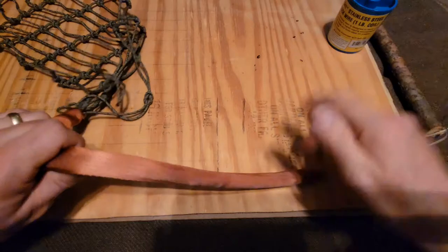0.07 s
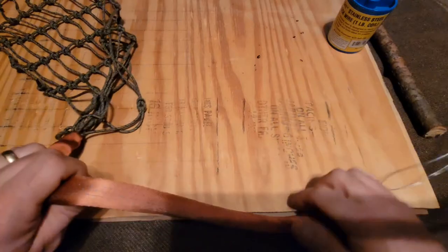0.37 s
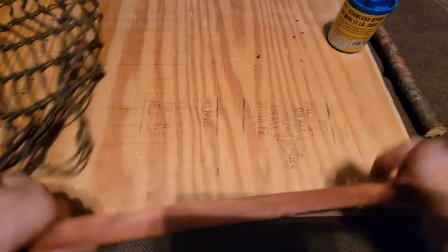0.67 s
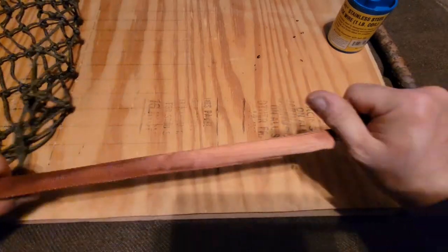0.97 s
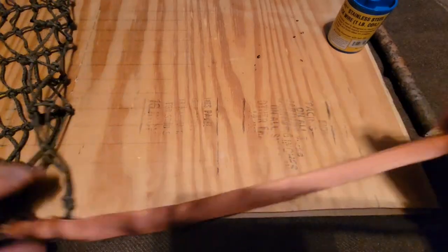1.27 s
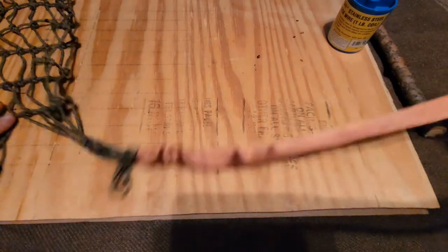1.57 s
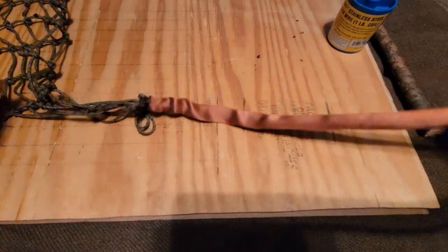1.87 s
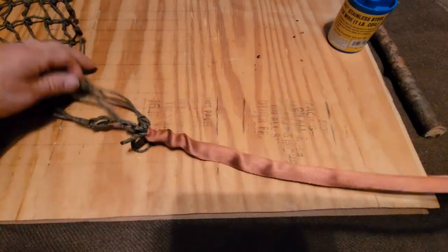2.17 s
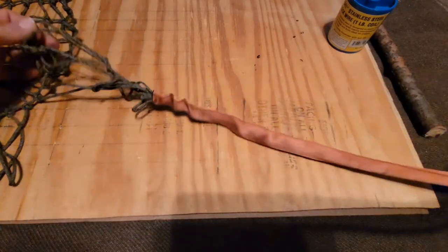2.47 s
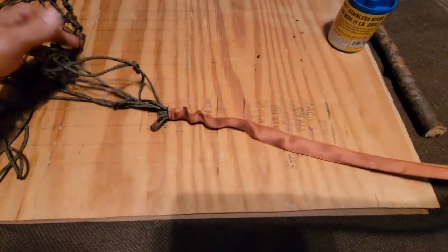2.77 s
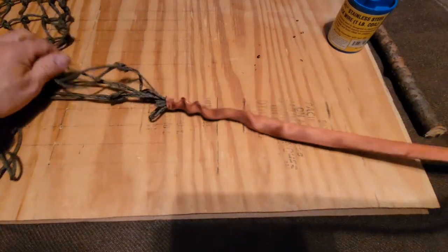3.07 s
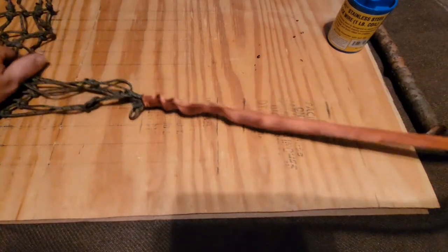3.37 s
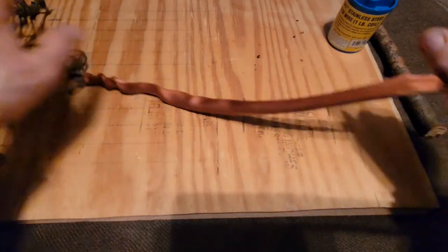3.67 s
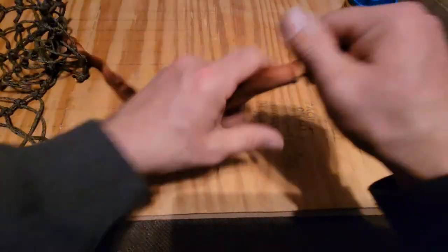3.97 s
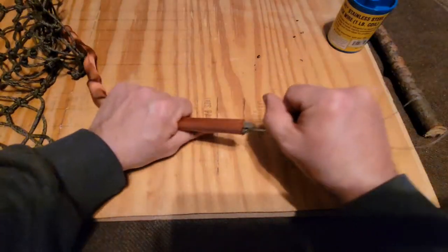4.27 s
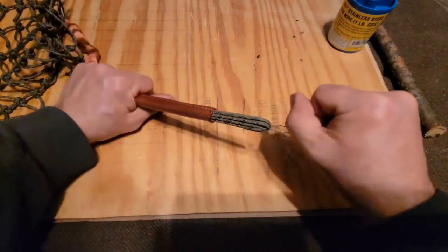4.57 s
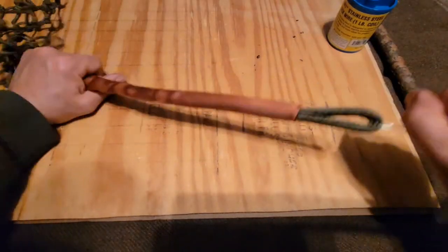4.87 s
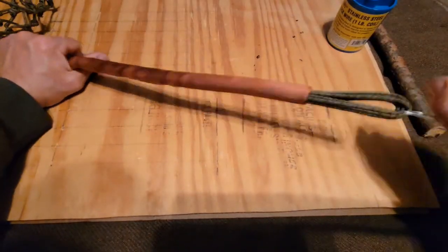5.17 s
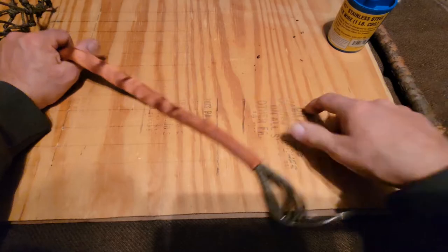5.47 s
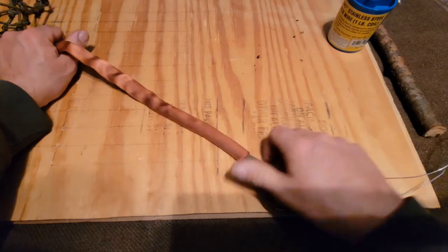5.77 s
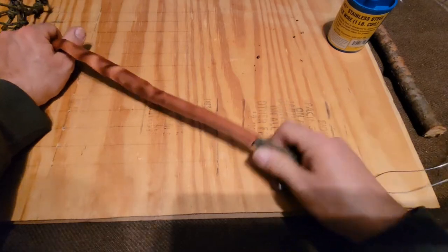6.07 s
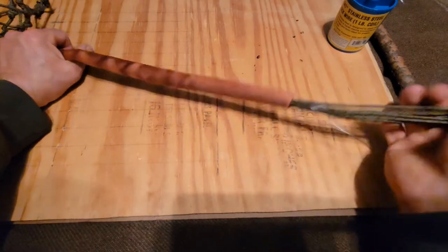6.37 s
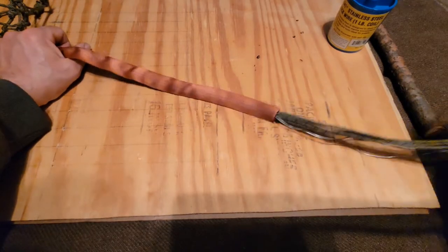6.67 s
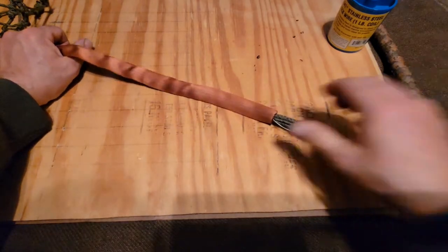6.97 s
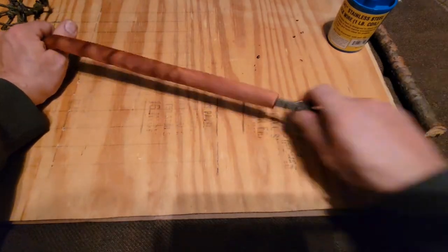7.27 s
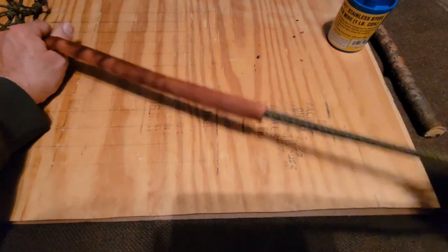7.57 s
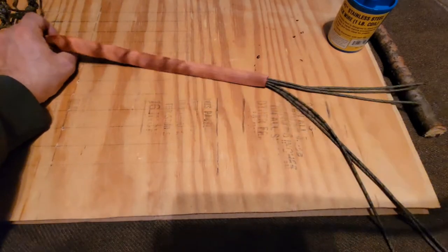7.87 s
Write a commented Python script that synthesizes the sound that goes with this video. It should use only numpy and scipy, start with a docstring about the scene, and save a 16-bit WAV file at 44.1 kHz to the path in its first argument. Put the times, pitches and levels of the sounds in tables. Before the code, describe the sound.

Close up in a small room, nylon webbing is bunched and slid along cord by hand, making dry, irregular rustles and swishes. Knotted netting drags across a plywood board, mixed with small clicks of wire and cord and soft hand bumps. After a quieter spell the strokes come thicker and a little louder, followed by a distinct knock on the wood, one more sliding pull and a final tap.

```python
"""Cord net through a nylon sleeve

Hands pull a cord net through a sleeve of nylon webbing on a plywood board, in a small room.
Stick-slip friction makes the weave hiss, sing and zip, and knots drag over the wood.
A thin pulling wire and the cord tick as they catch and snap free; bumps from hands and
bundled cord excite the damped modes of the board."""
import sys
import numpy as np
from scipy import signal
from scipy.fft import rfft, irfft, next_fast_len
from scipy.io import wavfile

SR = 44100
rng = np.random.default_rng(int(sys.argv[2]) if len(sys.argv) > 2 else 0)


def store_wav(level_fs):
    """Save 16-bit WAV to argv[1]."""
    pcm = np.round(np.clip(np.atleast_2d(level_fs), -1, 1) * 32767)
    wavfile.write(sys.argv[1], SR, pcm.T.astype(np.int16))


N = 352888

# spectrum of still air and microphone hiss: (frequency [Hz], relative density [dB])
AIR_SPECTRUM = [(20, -57.5), (70, 16), (250, 9), (500, 2), (1000, 5), (2000, -8.5), (4200, -5),
                (6000, -27.5), (16000, -27)]
# reverberation of the room: (frequency [Hz], T60 [s])
ROOM_DECAY = [(80, 0.53), (300, 0.27), (1000, 0.22), (4000, 0.19), (9000, 0.058), (16000, 0.17)]
# likeness of the diffuse sound at left and right: (frequency [Hz], correlation [-1 to 1])
COHERENCE = [(100, 0.85), (280, 0.87), (500, 0.016), (1100, -0.52), (2200, -0.27), (5000, -0.21),
             (16000, 0.15)]
# mismatch of the microphones: (frequency [Hz], left minus right [dB])
MIC_MISMATCH = [(300, 0.5), (1000, 0.5), (2000, -0.5), (4000, -2), (8000, 6), (12000, 2.5)]

# modes of the board and of the wire: (frequency [Hz], relative level [dB], T60 [s])
BOARD_MODES = [(78, -21.5, 0.13), (100, -9, 0.018), (154, -8.5, 0.017), (207, -14.5, 0.2), (298, 8.5, 0.02),
               (428, -10, 0.04), (550, -8.5, 0.029), (826, -1.5, 0.033), (988, 0, 0.037),
               (1216, 3.5, 0.019), (1660, -12, .03), (2350, -27, .02)]
WIRE_MODES = [(3800, 0, 0.16), (3980, 34, 0.21), (4900, -5.5, 0.16), (8100, -20, 0.11), (12400, -33, 0.12),
              (14000, -10, .1), (13500, 5, .07)]
# blows on the board: (time [s], relative peak level [dB], contact time [ms])
BLOWS = [(0.072, -43, 2.7), (0.536, -36.5, 5.3), (.55, -33, 3.5), (0.646, -22.5, 3.7), (1.75, -33, 6.1),
         (1.77, -39, 4.7), (2.285, -45, 0.54), (2.406, -40, 0.82), (2.635, -40, 0.32), (2.933, -29.5, 0.39),
         (2.942, -34, 4.2), (3.213, -41.5, 11), (3.56, -54, 1.2), (4.068, -26.5, 0.86), (4.776, -39.5, 13),
         (4.931, -34.5, 8.4), (5.075, -30.5, 5.6), (5.378, -42, 7.6), (5.565, -31, 0.59), (5.581, -34, 6.5),
         (5.614, -34.5, 8.5), (5.817, -30, 2.4), (5.831, -32.5, 0.97), (5.95, -30.5, 2.8), (6.086, -38, 10),
         (7.075, -44, 1.5), (7.124, -42, 1), (7.188, -43.5, 3.7), (7.3002, -15, 1.5), (7.31, -11.5, 1.54),
         (7.326, -29, 8), (7.355, -31, 0.69), (7.398, -44, 9.1), (7.989, -20, 0.55)]
# snaps of wire and cord: (time [s], relative level [dB], brightness index, left minus right [dB])
SNAPS = [(0.0458, -33, -22, 1.5), (0.0544, -30, -22, 3.5), (0.0731, -28, -12.5, 2.5),
         (0.1008, -34, -18, -1.0), (0.167, -38, -16, -4), (0.188, -36, -21, 8), (0.361, -33.5, -20, 0.5),
         (0.3894, -38.5, -24, -3.5), (0.4137, -34, -16, -1), (0.4736, -33, -19, 1.5),
         (0.4815, -34.5, -20, 1), (0.5386, -32, -26, 0), (0.5497, -32, -7, 3), (0.6481, -34, -10.5, 2.5),
         (1.298, -39.5, -22, 0.5), (1.737, -40, -40, 1), (1.7501, -30, -50, 3), (2.0877, -55, -17, 8),
         (2.259, -54, -8, 7), (2.282, -45, -46, 9.5), (2.544, -52, -13, -2), (2.6358, -44.5, -44, -0.5),
         (2.875, -47.5, -15, 13), (2.9316, -27, -35.5, 1.5), (3.5595, -39, -40, 4), (4.07, -30.5, -42, 0.0),
         (4.23, -42.5, -16.5, 3), (4.3216, -34, -14.5, 0.5), (4.975, -53, -36, 0), (5.0494, -31, -19, 3.5),
         (5.1074, -35, -19, 1.5), (5.1817, -33.5, -19, -0.5), (5.3505, -38, -20, 1.5),
         (5.46, -36.5, -20, 0), (5.6574, -36.5, -18, 2), (5.689, -17, -14.5, 2), (5.6972, -28, -11, -1.5),
         (5.8142, -33, -28, 2.5), (5.8519, -31, -15, -0.5), (5.9427, -31.5, -32, 1.5), (5.977, -36, -11, 2),
         (6.124, -42, -30, -0.5), (6.2405, -47.5, -21, 2.5), (6.325, -45, -17, 1), (6.495, -39, -1, -2),
         (6.711, -37.5, -16, -3.5), (6.7345, -32, -13, 1.5), (6.787, -30, -12, 0), (6.887, -30.5, -17, 1),
         (6.908, -29, -12.5, 1.5), (6.9204, -32, -30, -8), (7.08, -49, -23, 2.5), (7.2991, -35.5, -28, 5.5),
         (7.3557, -42, -24, 4.5), (7.8181, -28, 21, 0), (7.988, -25.5, -22.5, 0.5)]
# spectra of snapping wire, slapping cord, rubbed wood and rubbed nylon:
# (frequency [Hz], relative density [dB])
WIRE_SPECTRUM = [(100, 5), (500, -12.5), (1200, 4), (2000, 4.5), (2900, 7.5), (3900, 9.5), (5200, 2.5),
                 (7000, 1.5), (9800, -6), (12000, -1.5), (14000, -3), (16000, -13.5)]
SLAP_SPECTRUM = [(100, -22.5), (400, 10.5), (1100, 3.5), (1700, -1), (2700, 5), (4200, -15.5),
                 (6000, -18.5), (16000, -65)]
WOOD_SPECTRUM = [(25, -65), (70, -10.5), (130, -8), (240, 1.5), (340, -0.5), (480, -4), (620, -9),
                 (800, -3), (1080, -6), (1400, -15.5), (2400, -15.5), (4200, -26), (6000, -29),
                 (16000, -59)]
NYLON_SPECTRUM = [(100, -0.5), (600, -25.5), (850, -6), (1180, 3), (1600, 0.5), (2100, 1.5), (3200, 3),
                  (4200, 4), (5500, -4.5), (7500, -4.5), (10000, -7.5), (13000, -5), (14500, -6),
                  (16000, -12)]
# band in which the weave sings: (frequency [multiple of the centre], relative density [dB])
WEAVE_BAND = [(.02, -18), (.68, -28), (.86, -3.5), (1, 4), (1.11, -7.5), (1.25, -28), (3.6, -38)]

# where the rubbing is; each layer scales this bias: (time [s], leftward bias [dB])
RUB_POSITION = [(0, 2), (.65, 1.5), (.85, 2.5), (3.5, 3.5), (4.4, 3), (4.8, 4), (5.2, -2.5), (6.3, 1),
                (6.45, 3.5), (6.65, 0), (7.3, -4), (7.6, 4), (8, 2.5)]
# regular stick-slip on weave or wood:
# (start [s], length [s], first frequency [Hz], last frequency [Hz], level [dB], pitch jitter [fraction])
SLIP_GLIDES = [(3.82, .11, 12950, 12700, -73, .005), (3.92, .26, 9800, 7300, -75, .006),
               (4.04, .12, 11700, 10450, -77, .006), (4.04, .05, 1043, 1240, -54, .15),
               (5.736, 0.046, 175, 139, -41, .02), (6.427, .1, 1000, 1800, -54, 0.2),
               (6.659, 0.21, 290.6, 263, -56, 0.316), (7.387, .095, 4450, 5750, -74, .014),
               (7.9, 0.08, 12100, 11250, -68, .005)]
# steady pulls of cord or wire through the sleeve, at relative levels:
# (start [s], length [s], hiss [dB], singing [dB], band centre [Hz])
LONG_PULLS = [(0.222, 0.39, -63, -57.5, 1620), (0.979, 0.63, -66.5, -63, 4500),
              (3.727, 0.42, -61.5, -62.5, 4380), (5.719, 0.32, -69, -58.5, 4350),
              (7.462, .46, -61, -70, 3950)]
# rustle of the held net, at relative levels: (time [s], nylon [dB], wood [dB])
NET_RUSTLE = [(0, -54, -54.5), (.3, -88.5, -60), (.68, -60.5, -76), (.8, -66.5, -64.5),
              (1.55, -67.5, -57.5), (2.1, -79, -84), (2.7, -64, -69.5), (3.1, -70.5, -70),
              (3.3, -63, -56.5), (3.95, -75, -60.5), (4.45, -69, -68.5), (5.3, -62, -59.5),
              (5.53, -70, -73), (5.9, -60.5, -56.5), (6.27, -67, -68.5), (6.85, -60, -74),
              (7.22, -73.5, -71), (7.9, -65, -61)]
# hand strokes, at relative levels; a tighter grip adds to the nylon's rasp below RASP_HZ:
# (start [s], rise time [s], length [s], hiss [dB], drag on wood [dB], grip [dB])
HAND_STROKES = [(0.0, .02, 0.077, -69.5, -51, -8), (0.347, 0.0085, 0.23, -67, -55, 7.5),
                (0.63, .012, 0.047, -56, -47, 4.5), (0.847, 0.083, 0.18, -53, -45.5, -1),
                (1.71, .04, 0.23, -52.5, -50, -11), (2.211, .05, 0.1, -72, -62.5, -13),
                (2.383, .03, 0.13, -74, -62.5, -0.5), (2.561, .05, 0.092, -98.5, -57.5, 8.5),
                (2.706, 0.033, 0.029, -55, -52.5, -2), (2.787, .015, 0.013, -58.5, -67, -5),
                (2.859, 0.052, 0.14, -55, -54, -3), (3.154, .06, 0.073, -54.5, -56.5, 2),
                (3.311, .1, 0.13, -49.5, -44.5, -8), (3.515, .12, 0.36, -57.5, -57, 1),
                (4.03, 0.011, 0.045, -80.5, -40, 25.5), (4.15, .06, 0.065, -54.5, -63, -8),
                (4.272, 0.01, 0.033, -64, -53, -7), (4.304, 0.0074, 0.012, -61, -50, -1),
                (4.535, .075, 0.086, -52, -54, -2), (4.73, 0.057, .06, -51.5, -55, -2.5),
                (4.862, 0.046, 0.12, -49, -54, 0.5), (5.042, 0.011, 0.071, -46.5, -49, 0.5),
                (5.137, 0.056, .125, -50.5, -53.5, -9), (5.346, .008, 0.12, -60.5, -59.5, 0.5),
                (5.557, .012, 0.094, -59, -52.5, 0.5), (5.637, .08, 0.1, -44.5, -44.5, -1.5),
                (5.747, .04, 0.09, -51.5, -52, -0.5), (5.89, .04, 0.15, -67.5, -62.5, 13),
                (6.367, .09, 0.17, -53, -76, -3.5), (6.534, .05, 0.11, -61, -56.5, 4.5),
                (6.662, .07, 0.13, -54.5, -59, 3), (6.863, .03, 0.11, -58, -52.5, -4),
                (7.29, 0.011, 0.066, -60.5, -45.5, 6), (7.363, 0.015, 0.042, -64.5, -67, 8),
                (7.785, .09, 0.12, -53.5, -60.5, -15), (7.978, .012, 0.025, -56, -38.5, 19.5)]

RASP_HZ, RESTING_GRIP_DB = 4000, -2
PULL_RISE_S, STOP_TIME_CONSTANT_S = 0.039, 0.021
LEAD_MS_PER_DB = 0.38


def amp(db):
    """Amplitude ratio of a level in decibels."""
    return 10 ** (np.asarray(db) / 20)


def unit(x):
    """Normalisation to rms 1."""
    return x / np.sqrt(np.mean(x ** 2) + 1e-20)


def at_frequency(points, hz):
    """Interpolation on a log-frequency axis."""
    f, value = np.transpose(points)
    return np.interp(np.log(hz + 1), np.log(f), value)


def curve(rows):
    """Linear interpolation of a time curve at every sample."""
    return np.interp(np.arange(N) / SR, *np.transpose(rows))


def add(mix, start_s, sound):
    """Superposition: a sound joins the mix at its start time."""
    part = mix[..., max(round(start_s * SR), 0):][..., :sound.shape[-1]]
    part += sound[..., :part.shape[-1]]


def colour(x, spectrum, tilt_db=0, size=2048):
    """Minimum-phase filtering to a spectrum; the tilt is a treble shelf."""
    hz = abs(np.fft.fftfreq(size, 1 / SR))
    shelf_db = tilt_db * hz ** 2 / (hz ** 2 + 7000 ** 2)
    log_gain = np.log(amp(at_frequency(spectrum, hz) + shelf_db))
    taps = np.fft.ifft(np.exp(np.conj(signal.hilbert(log_gain)))).real
    return signal.oaconvolve(x, taps)[:len(x)]


def wander(rate_hz, size=N):
    """Smooth random fluctuation: low-passed noise of rms 1."""
    span = next_fast_len(size)
    hz = np.fft.rfftfreq(span, 1 / SR)
    spectrum = rfft(rng.standard_normal(span)) / (1 + (hz / rate_hz) ** 4)
    return unit(irfft(spectrum, span)[:size])


def micro_slips(per_s, spread_db):
    """Shot noise: tiny slips at random times, a few much larger than the rest."""
    size = amp(spread_db * np.minimum(rng.exponential(1, N), 4))
    return unit(size * rng.choice([-1, 1], N) * (rng.random(N) < per_s / SR))


def placed(x, pan_db):
    """Level and time differences: the nearer microphone hears a sound louder and earlier."""
    lead = pan_db * LEAD_MS_PER_DB * SR / 1000
    channels = []
    for side in (1, -1):
        index = np.rint(np.arange(len(x)) + side * lead / 2).astype(int)
        channels.append(amp(side * pan_db / 2) * x[np.clip(index, 0, len(x) - 1)])
    return np.array(channels)


def diffuse_pair(spectra, hz):
    """Partial coherence: two independent spectra become alike in the bass, partly opposed in the middle."""
    same = np.clip(at_frequency(COHERENCE, hz), -1, 1)
    return np.array([spectra[0], same * spectra[0] + np.sqrt(1 - same ** 2) * spectra[1]])


def still_air():
    """Stationary noise: the air of the room and microphone hiss."""
    span = next_fast_len(N)
    hz = np.fft.rfftfreq(span, 1 / SR)
    noise = diffuse_pair(rfft(rng.standard_normal((2, span))), hz)
    air = irfft(noise * amp(at_frequency(AIR_SPECTRUM, hz)), span)[:, :N]
    return amp(-64) * unit(air)


def echoes(early_db, early_s):
    """Impulse response: early reflections from board and hands, then the room's exponential decay."""
    hz, t, noise = signal.stft(rng.standard_normal((2, SR // 4)), SR, nperseg=256)
    decay = amp(-60 * t / at_frequency(ROOM_DECAY, hz)[:, None])
    early_boost = 1 + amp(early_db) * np.exp(-t / early_s)
    tail = signal.istft(diffuse_pair(noise, hz[:, None]) * decay * early_boost, SR, nperseg=256)[1]
    tail *= np.minimum(np.arange(tail.shape[1]) / SR / 0.0018, 1) ** 2
    return tail / np.linalg.norm(tail, axis=1, keepdims=True)


def room(x, wet_db, early_db, early_s, patterns, turn_s=0.03):
    """Time-varying reflection: as the hands move, one echo pattern fades into the next every turn_s."""
    source = unit(x[0]) * np.sqrt(np.mean(x ** 2))
    out = x.copy()
    turn = np.arange(N) / SR / turn_s
    for k in range(patterns):
        share = np.sqrt(np.maximum(1 - abs((turn + k) % patterns - 1), 0))
        reflected = signal.oaconvolve((source * share)[None], echoes(early_db, early_s), axes=1)
        out += amp(wet_db) * reflected[:, :N]
    return out


def damped_modes(modes, t):
    """Free vibration: one exponentially decaying sinusoid for each mode."""
    return [amp(db - 60 * t / t60) * np.sin(2 * np.pi * hz * t) for hz, db, t60 in modes]


def board_knocks():
    """Impact excitation: a force pulse rings the board; the longer the contact, the duller the thud."""
    out, t = np.zeros(N), np.arange(SR // 3) / SR
    # neighbouring modes swing in opposite directions, so the ring takes a cycle to build
    ring = sum((-1) ** k * mode for k, mode in enumerate(damped_modes(BOARD_MODES, t)))
    # the ring carries no deep rumble below about 60 Hz
    ring = signal.sosfilt(signal.butter(3, 62, "high", fs=SR, output="sos"), ring)
    for start, db, contact_ms in BLOWS:
        progress = 1000 * t / contact_ms
        force = progress * np.exp(-3 * progress)
        thud = signal.fftconvolve(ring, force)[:len(t)]
        add(out, start, amp(db - 1.5) * thud / abs(thud).max())
    return np.array([out, out])


def wire_and_cord_ticks():
    """Transients of catch and release: bright ones are the wire, dull ones cord slapping wood."""
    out, t = np.zeros((2, N)), np.arange(SR // 8) / SR
    median_brightness = np.median(np.transpose(SNAPS)[2])
    ping = amp(-27.5) * unit(sum(damped_modes(WIRE_MODES, t)))
    attack = 1 - np.exp(-t / 0.00028)
    snap, chatter = np.exp(-t / 0.0015), 0.065 * np.exp(-t / 0.024)
    for start, db, brightness, pan_db in SNAPS:
        excess = brightness - median_brightness
        burst = rng.standard_normal(len(t)) * attack * (snap + chatter)
        wire = unit(colour(burst, WIRE_SPECTRUM, tilt_db=1.94 * excess)) + ping
        cord = amp(-0.9 * excess - 18) * unit(colour(burst, SLAP_SPECTRUM))
        tick = wire + cord
        tick *= amp(db + 17) / np.linalg.norm(tick)
        add(out, start, placed(np.pad(tick, (16, 0)), pan_db))  # padding lets the near side lead
    return out


def hand_speed(rise_s, length_s):
    """Velocity envelope of a stroke: a smooth rise, a hold and an exponential stop."""
    t = np.arange(0, length_s + 0.2, 1 / SR)
    rise = np.sin(np.pi / 2 * np.minimum(t / rise_s, 1)) ** 2
    return rise * np.exp(-np.maximum(t - length_s, 0) / STOP_TIME_CONSTANT_S)


def friction_gains():
    """Incoherent sources add in power: rustle, strokes and pulls set the gains of hiss, rasp and drag."""
    rustle = np.array(NET_RUSTLE)
    nylon_db, wood_db = curve(rustle[:, [0, 1]]), curve(rustle[:, [0, 2]])
    power = amp([nylon_db, nylon_db + RESTING_GRIP_DB, wood_db]) ** 2
    for start, rise, length, hiss_db, drag_db, grip_db in HAND_STROKES:
        gains = amp([hiss_db, hiss_db + grip_db, drag_db])
        add(power, start, np.outer(gains, hand_speed(rise, length)) ** 2)
    for start, length, hiss_db, *_ in LONG_PULLS:
        add(power[:2], start, (amp(hiss_db) * hand_speed(PULL_RISE_S, length)) ** 2)
    return np.sqrt(power)


def zipping():
    """Periodic stick-slip: evenly spaced slips make a tone that glides with the speed of the pull."""
    out = np.zeros(N)
    for start, length, first_hz, last_hz, db, jitter in SLIP_GLIDES:
        size = int(length * SR)
        glide = np.linspace(0, 1, size) ** 1.7  # starts slowly and steepens
        hz = first_hz + (last_hz - first_hz) * glide
        hz *= 1 + jitter * wander(rate_hz=380, size=size)
        tone = np.sin(2 * np.pi * np.cumsum(hz) / SR)
        add(out, start, amp(db) * unit(tone * signal.windows.tukey(size, 0.5)))
    return np.array([out, out])


def weave_singing():
    """Narrow-band friction noise: in a long pull the weave sings with an amplitude that follows speed."""
    out = np.zeros(N)
    for start, length, _, db, centre_hz in LONG_PULLS:
        speed = hand_speed(PULL_RISE_S, length)
        band = colour(rng.standard_normal(len(speed)), np.multiply(WEAVE_BAND, (centre_hz, 1)))
        add(out, start, amp(db - 2) * speed * unit(band))
    return placed(out, 0.4 * curve(RUB_POSITION))


def knots_dragging(gain):
    """Roughness excitation: knots stumble over the grain and sound the wood."""
    slips = micro_slips(per_s=900, spread_db=4) * amp(1.2 * wander(rate_hz=17.5))
    scrape = amp(-2) * unit(colour(slips, WOOD_SPECTRUM))
    return placed(scrape * gain, 0.52 * curve(RUB_POSITION))


def nylon_sliding(hiss_gain, rasp_gain):
    """Random stick-slip: thousands of fibres catch and let go, in uneven clumps."""
    slips = micro_slips(per_s=14000, spread_db=4.5) * amp(1.07 * wander(rate_hz=23))
    friction = amp(1.5) * unit(colour(slips, NYLON_SPECTRUM))
    rasp = signal.sosfiltfilt(signal.butter(2, RASP_HZ, fs=SR, output="sos"), friction)
    hiss = friction - rasp
    return placed(hiss * hiss_gain + rasp * rasp_gain, curve(RUB_POSITION))


def scene():
    """Superposition of all the handling and its echoes, heard from just above the board."""
    hiss_gain, rasp_gain, drag_gain = friction_gains()
    nylon = nylon_sliding(hiss_gain, rasp_gain)
    nylon = room(nylon, wet_db=1.5, early_db=12.5, early_s=0.0033, patterns=6, turn_s=0.011)
    wood_and_weave = knots_dragging(drag_gain) + weave_singing() + zipping()
    wood_and_weave = room(wood_and_weave, wet_db=2.5, early_db=11.5, early_s=0.0061, patterns=4)
    # the echoes too are stronger on the near side
    balance = amp(0.068 * np.array([[1], [-1]]) * curve(RUB_POSITION))
    ticks = room(wire_and_cord_ticks(), wet_db=-0.5, early_db=-8, early_s=0.025, patterns=2)
    knocks = room(board_knocks(), wet_db=-7.5, early_db=18, early_s=0.012, patterns=2)
    return still_air() + knocks + ticks + (wood_and_weave + nylon) * balance


def record(dry):
    """Frequency response: two microphones of slightly different colour, then a low-pass band limit."""
    heard = np.array([colour(x, np.multiply(MIC_MISMATCH, (1, side / 2)))
                      for x, side in zip(dry, (1, -1))])
    low_pass = signal.firwin(511, 16100, window=("kaiser", 9), fs=SR)
    return signal.oaconvolve(heard, low_pass[None], "same")


dry = scene()
out = record(dry)
store_wav(out)
```